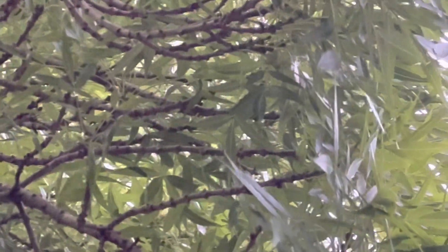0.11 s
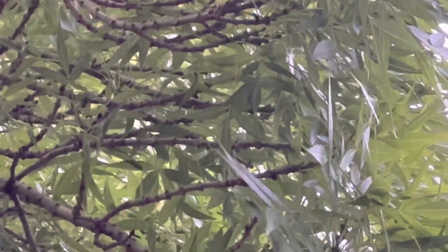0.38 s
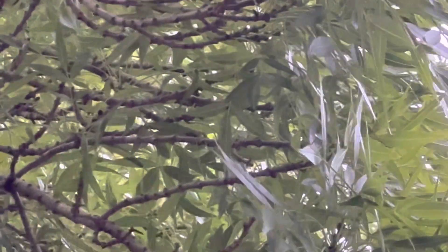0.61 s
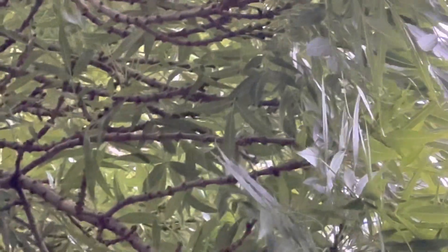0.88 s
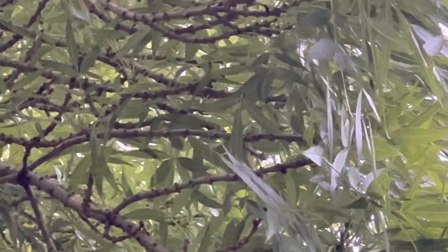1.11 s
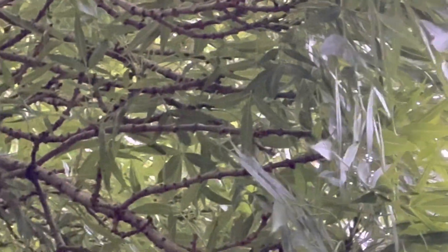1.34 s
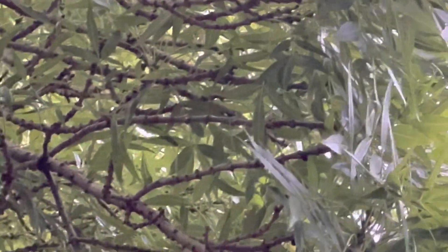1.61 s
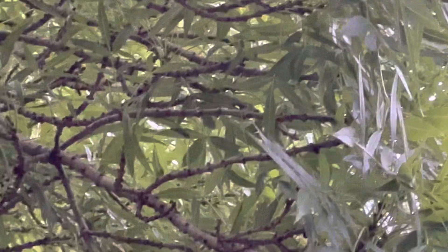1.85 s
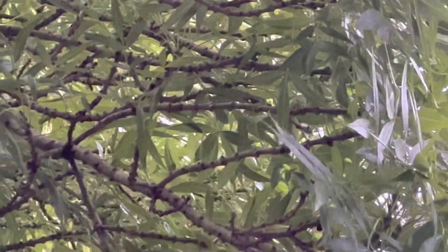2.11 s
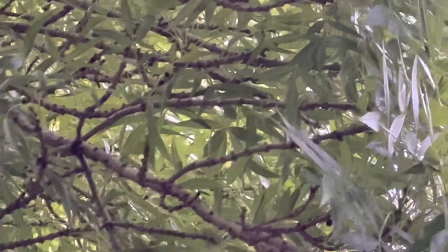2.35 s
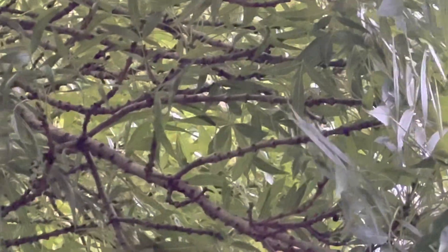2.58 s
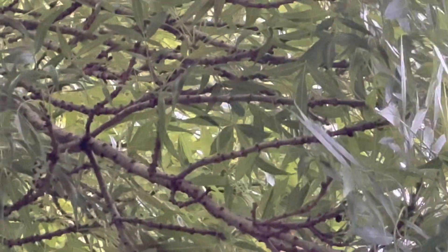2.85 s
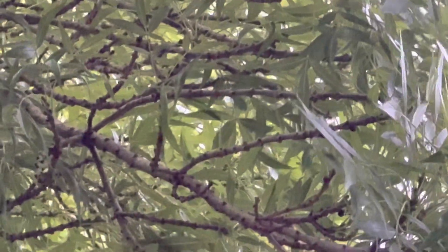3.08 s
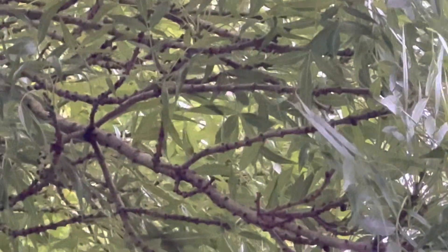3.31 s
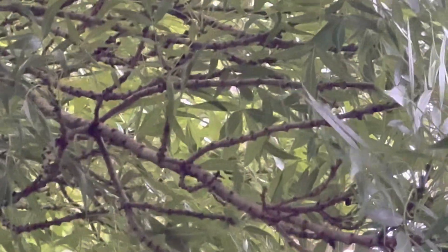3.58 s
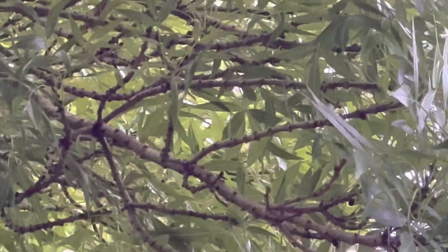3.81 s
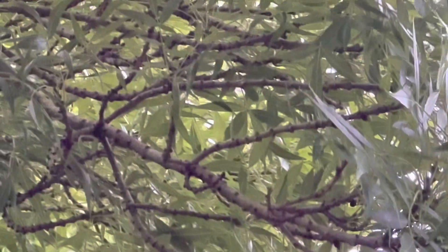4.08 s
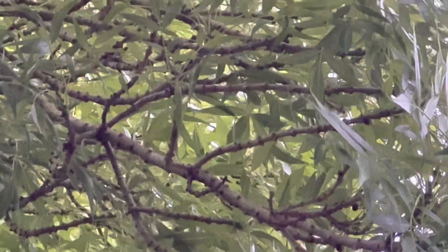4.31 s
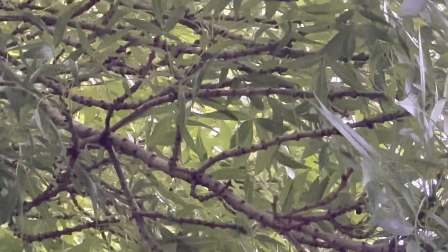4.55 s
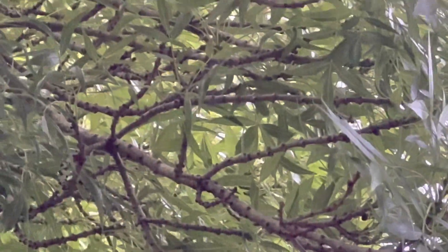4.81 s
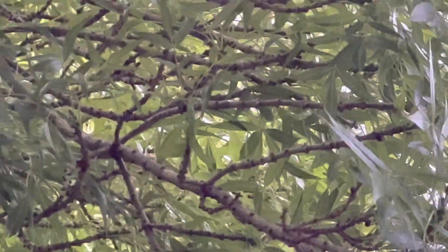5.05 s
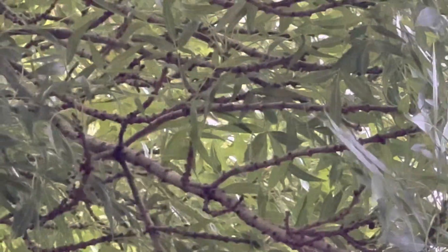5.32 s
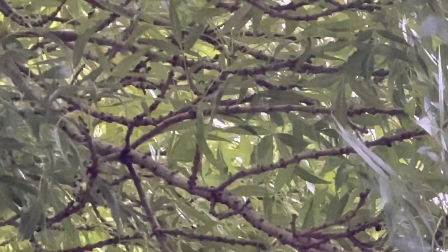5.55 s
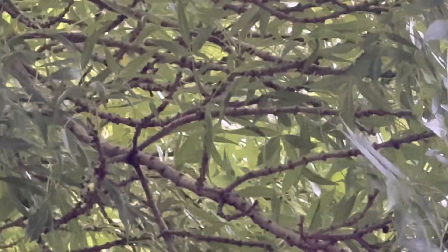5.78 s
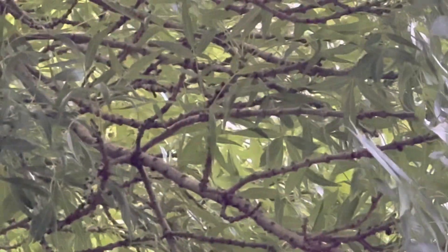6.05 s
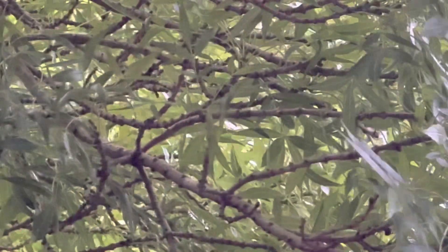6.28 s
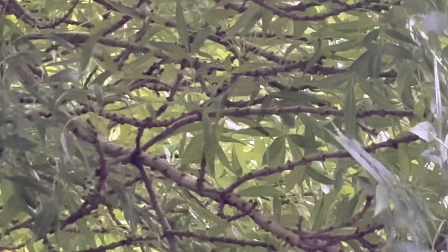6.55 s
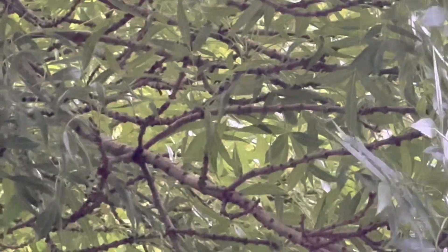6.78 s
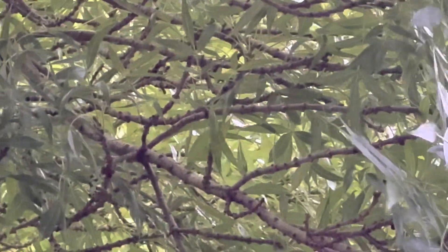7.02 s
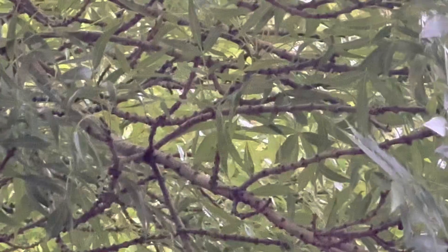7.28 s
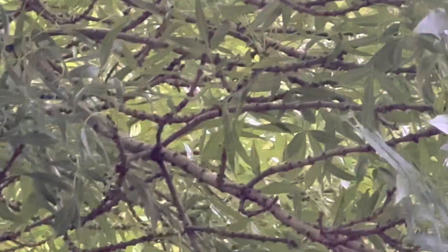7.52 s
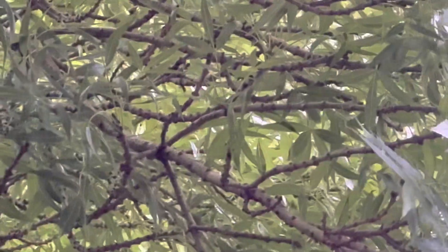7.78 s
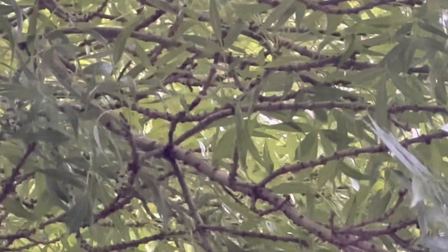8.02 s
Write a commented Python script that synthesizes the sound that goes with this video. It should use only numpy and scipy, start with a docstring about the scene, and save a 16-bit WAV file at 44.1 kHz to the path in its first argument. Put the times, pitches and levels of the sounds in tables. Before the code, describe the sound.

A small bird scolds with harsh arched notes and fast dry rattles in a leafy tree, while low wind thumps buffet the microphone.

```python
"""Harsh arched notes come first: a small bird scolding in a leafy tree, breaking into fast dry rattles.
Both are paired voices of its syrinx, beating together and coloured by a beak resonance.
A second bird throws in four chirps, warbling sines with hoarse overtones; a twig ticks close by.
Gusts of shaped noise and low eddies buffet the two ports of a hand-held microphone.
Far off, a narrow band of noise swells as a drone, and leaves hiss faintly."""
import sys
import numpy as np
from scipy import signal
from scipy.fft import rfft, irfft
from scipy.io import wavfile

SR = 44100
rng = np.random.default_rng(int(sys.argv[2]) if len(sys.argv) > 2 else 0)


def how_loud(loudness_db):
    """Turn decibels into a plain amplitude multiplier (0 dB gives 1, 20 dB gives 10)."""
    steps = np.asarray(loudness_db, float) / 20
    return 10 ** steps


def to_wav(sig):
    """Store sig (one row per channel, or 1-D mono) as 16-bit WAV at the path in sys.argv[1].

    Samples outside -1..1 are clipped; the rate is SR.
    """
    pcm = np.clip(np.atleast_2d(sig), -1, 1) * 32767
    pcm = np.round(pcm).astype(np.int16)
    wavfile.write(sys.argv[1], SR, pcm.T)  # frames by channels


N = 358974   # length in samples
HZ = np.maximum(np.fft.rfftfreq(N, 1 / SR), 1)   # FFT grid


def rms_one(x):
    """Scale to rms 1."""
    return x / np.sqrt(np.mean(x ** 2) + 1e-20)


def in_time(rows):
    """Columns of a curve at every sample."""
    s, *columns = np.transpose(rows)
    return [np.interp(np.arange(N) / SR, s, column) for column in columns]


def at_hz(points):
    """A spectrum table on the FFT grid, interpolated over log frequency."""
    hz, value = np.transpose(points)
    return np.interp(np.log(HZ), np.log(hz), value)


def wobble(rate_hz, count):
    """Smooth low-pass noise of rms 1, from two equal poles."""
    r = np.exp(-2 * np.pi * rate_hz / SR)
    run_in = int(SR / rate_hz)
    white = rng.standard_normal(count + run_in)
    return rms_one(signal.lfilter([1], [1, -2 * r, r * r], white)[run_in:])


def add(out, s, sound):
    """Mix a sound in at a time in seconds."""
    i = round(s * SR)
    out[i:i + len(sound)] += sound[:N - i]


# likeness of the noise at the two ports: (f/Hz, likeness 0-1)
PORT_LIKENESS = [(60, 0.87), (300, 0.89), (690, 0.56), (1100, 0.86), (1500, 0.36), (2100, 0.93), (3000, 1),
                 (8000, 0.71), (9600, 0.36), (14000, 0.61)]


def noise_pair(gain):
    """Coloured noise, as alike in both ports as the table says; rms 1."""
    mid, side = rfft(rng.standard_normal((2, N))) * gain
    alike = np.clip(at_hz(PORT_LIKENESS), 0, 1)
    ports = np.sqrt(1 + alike) * mid + np.sqrt(1 - alike) * side * [[1], [-1]]
    return rms_one(irfft(ports, N))


# strength of harmonics 1, 2, 3.. before the beak: (level/dB)
SYRINX_HARMONICS = [-4.5, -4, -5.5, -10, -12, -7.5, -28, -41.5]


def syrinx_note(level_db, top_hz, length, rough, beak_hz, shape, apart_hz, beak_db=10, beak_width=0.33):
    """Two voices beat together: harmonic k of their sum splits into k + 1 lines, coloured by the beak."""
    u = np.linspace(0, 1, max(int(length * SR), 64))   # share of the note
    bend = np.clip(length / .105, .65, 1)   # short notes bend less
    hz = top_hz * np.interp(u, *np.transpose(shape)) ** bend
    shake = .11 * np.clip(rough, 0, 1) ** 1.6
    # phases in cycles: the upper voice, and the beat between the two
    upper = np.cumsum(hz * (1 + shake * wobble(323.6, count=len(u)))) / SR
    beat = np.cumsum(apart_hz + shake * hz * wobble(357.0, count=len(u))) / SR + rng.random()
    beak = np.interp(u, [.18, .45, 1], (*beak_hz, 0.85 * beak_hz[1]))
    voices, shares = 0, np.ones(1)
    for k, db in enumerate(SYRINX_HARMONICS, start=1):
        shares = np.convolve(shares, [1, .8])   # binomial strengths of the split lines
        for j, share in enumerate(shares / np.linalg.norm(shares)):
            off_peak = np.log((k * hz - j * apart_hz) / beak) / beak_width
            lift_db = beak_db * np.exp(-off_peak ** 2)
            line = np.sin(2 * np.pi * (k * upper - j * beat + rng.random()))
            voices = voices + share * how_loud(db + lift_db) * line
    # air escapes in puffs at the beat rate, most at the start
    hissing = np.diff(rng.standard_normal(len(u) + 1))
    breath = hissing * (1 + np.cos(2 * np.pi * beat)) * np.exp(-1.5 * u)
    sound = rms_one(rms_one(voices) + how_loud(-20 + 2.2 * rough) * breath)
    attack = np.minimum(u * length / 0.013, 1) ** 0.4
    release = np.clip((1 - u) / 0.55, 0, 1)
    swell = attack * release * (0.56 + 0.3 * np.sin(np.pi * u ** 0.91))
    return how_loud(level_db - 9 + 0.88 * wobble(60, count=len(u))) * swell * sound


# arched notes: (t/s, nominal level/dB, top f/Hz, length/s, roughness 0-1)
ARCHED_NOTES = [(0.0156, -41, 2017, 0.11, 0.38), (0.193, -41, 1950, 0.097, 0.4),
                (0.3386, -39.5, 1943, .1, 0.41), (0.4893, -43, 1915, 0.11, 0.32),
                (1.418, -43.5, 1519, 0.081, 0.17), (1.5546, -40.5, 1620, 0.082, 0.42),
                (1.8463, -44.5, 1570, 0.089, 0.36), (1.979, -36.5, 1841, 0.09, 0.22),
                (2.128, -35, 1918, 0.1, 0.3), (2.306, -37, 1940, 0.12, 0.34),
                (2.4627, -38.5, 1967, 0.12, 0.36), (2.683, -39.5, 1890, 0.11, 0.41),
                (2.868, -38.5, 1929, .105, 0.39), (6.183, -42, 1782, 0.097, 0.42),
                (6.3248, -38, 1953, 0.12, 0.42), (6.4998, -36, 2037, 0.12, 0.38),
                (6.6712, -36.5, 2020, .11, 0.25), (7.796, -41.5, 2030, 0.1, 0.73)]
# pitch through an arch, before short notes flatten it: (share of length, share of top f)
ARCH_PITCH = [(0, .73), (.15, .86), (.36, 1), (.47, .98), (.72, .78), (1, .54)]


def arched_notes():
    """Long notes with split lines; the beak resonance falls towards the voice as the beak closes."""
    beak_open_hz, beak_closes_to = 5250, 1.6   # the second is a multiple of the top pitch
    out = np.zeros(N)
    for s, db, hz, length, rough in ARCHED_NOTES:
        beak_hz = (beak_open_hz, beak_closes_to * hz)
        add(out, s - .008, syrinx_note(db, hz, length, rough, beak_hz, ARCH_PITCH, apart_hz=.165 * hz))
    return out


# rattle notes: (t/s, nominal level/dB)
RATTLE_NOTES = [(.6678, -54.5), (0.7185, -61), (0.8046, -48), (0.8605, -47), (0.9285, -47), (0.998, -43),
                (1.2174, -42), (1.3268, -45), (3.4062, -48), (3.4806, -49.5), (3.547, -49), (3.6071, -49),
                (3.6658, -49.5), (3.708, -46), (3.8595, -47), (3.92, -47.5), (3.9761, -48.5),
                (4.0712, -47.5), (4.143, -49.5), (4.1897, -50), (4.238, -49), (4.2914, -46), (4.341, -49),
                (4.3921, -50.5), (4.4398, -52.5), (4.4858, -50), (4.545, -50), (4.5833, -46.5),
                (4.6352, -46), (4.6827, -46.5), (4.7327, -56.5), (4.8162, -47), (4.8694, -46),
                (4.9207, -44.5), (4.9691, -46), (5.0599, -45), (5.1298, -44.5), (5.1849, -46),
                (5.2439, -46), (5.3261, -44.5), (5.3984, -46.5), (5.4662, -51.5), (5.5148, -49.5),
                (5.593, -44.5), (5.718, -42.5), (5.782, -45), (5.872, -45), (5.9048, -44), (6.0282, -51.5),
                (6.0967, -45.5), (6.8495, -45), (6.9257, -48), (6.9803, -47.5), (7.0338, -48.5),
                (7.1607, -47), (7.2238, -44.5), (7.2734, -50.5), (7.3439, -51.5), (7.41, -46),
                (7.4731, -48), (7.534, -45.5), (7.6672, -46.5)]
# pitch through a rattle note, before short notes flatten it: (share of length, share of top f)
RATTLE_PITCH = [(0, 0.85), (0.301, 0.98), (1.002, 0.93)]
# how the bird holds its rattle: (t/s, mean top f/Hz, beak resonance f/Hz early in a note)
RATTLE_HOLD = [(.7, 1860, 3620), (1.0, 1760, 4100), (1.22, 1925, 6050), (1.32, 1701, 3315),
               (3.41, 1717, 3300), (3.95, 1864, 3750), (4.3, 1716, 3790), (4.68, 1726, 5100),
               (4.98, 1814, 5250), (5.05, 1830, 4200), (5.4, 2150, 4570), (6.03, 2245, 4140),
               (6.09, 1740, 3420), (6.85, 1744, 4100), (7.04, 1860, 4020), (7.16, 1738, 3780),
               (7.55, 1990, 4360)]


def rattles():
    """Short, rough, throbbing notes, longer before a pause; louder ones have a lower beak peak."""
    pitch_scatter = 0.0403   # share, note to note
    usual_db, usual_beak_db, beak_db_per_db = -47, 11, -1.03
    duty, shortest_s, longest_s = 0.619, .03, 0.0495   # duty: share of the time to the next note
    out = np.zeros(N)
    pauses = np.diff(np.append(np.array(RATTLE_NOTES)[:, 0], np.inf))
    pitch_hz, beak_hz = in_time(RATTLE_HOLD)
    for (s, db), pause in zip(RATTLE_NOTES, pauses):
        length = np.clip(duty * pause, shortest_s, longest_s)
        i = int(s * SR)
        hz = pitch_hz[i] * (1 + pitch_scatter * rng.standard_normal())
        beak = (beak_hz[i], 1.12 * beak_hz[i])
        beak_db = usual_beak_db + beak_db_per_db * (db - usual_db)
        add(out, s - .008, syrinx_note(db, hz, length, 0.96, beak, RATTLE_PITCH, 169.4, beak_db, 0.28))
    return out


# chirps of the second bird: (t/s, level/dB)
CHIRP_CALLS = [(1.657, -45), (3.733, -44), (5.925, -44), (7.586, -45)]
# course of one chirp: (t/s from its listed time, f/Hz before warble, level/dB against the call)
CHIRP_COURSE = [(-.008, 2090, -20.5), (0, 2900, -19), (.008, 3950, -6), (0.026, 4019, -1),
                (0.03, 3242, -5.5), (0.039, 2906, -2.5), (0.045, 2400, -13.5), (0.056, 3021, 0.5),
                (.078, 2750, -7.5), (.088, 2340, -13.5), (0.108, 2710, -30)]


def chirping_bird():
    """A warbling, throbbing sine with hoarse overtones, and a thin upward flick near its start."""
    out = np.zeros(N)
    t, hz, db = np.transpose(CHIRP_COURSE)
    time = np.arange(t[0], t[-1], 1 / SR)
    for s, level_db in CHIRP_CALLS:
        regular = (0.0088 + .3 * time) * np.sin(2 * np.pi * 115 * time)
        warble = 1 + 0.0296 * wobble(200, count=len(time)) + regular
        phase = 2 * np.pi * np.cumsum(np.interp(time, t, hz) * warble) / SR
        tone = np.sin(phase) * (1 + how_loud(-18) * wobble(1520, count=len(time)))
        # a fast throb roughens the glide
        throb_depth = 0.25 + 0.51 * np.exp(-(time / 0.029) ** 4)
        tone *= 1 + throb_depth * np.sin(2 * np.pi * (300 * time + rng.random()))
        overtones = how_loud(-14.5) * np.sin(2 * phase) + how_loud(-9) * np.sin(3 * phase) + how_loud(-25.5) * np.sin(5 * phase)
        tone += overtones * wobble(630, count=len(time))   # hoarse, so they spread into bands
        course_db = level_db + np.interp(time, t, db) + 1.6 * wobble(110, count=len(time))
        add(out, s + t[0], how_loud(course_db) * np.sqrt(2) * tone)
        flick = 2 * np.pi * np.cumsum(np.geomspace(3700, 6300, int(0.011 * SR))) / SR
        add(out, s - .001, how_loud(level_db - 10) * np.hanning(len(flick)) * np.sin(flick))
    return out


def foliage(x, echo_db):
    """Countless small echoes from leaves and walls: a dying noise, partly different at each port."""
    echo_t60_s = 0.25
    t = np.arange(int(.6 * SR)) / SR
    shared, own = rng.standard_normal((2, len(t)))
    dying = how_loud(-60 * t / echo_t60_s) * np.minimum(t / 0.00064, 1)
    tails = (shared + 0.22 * own * [[1], [-1]]) * dying / np.sqrt(np.sum(dying ** 2))
    return x + how_loud(echo_db) * signal.fftconvolve(x[None], tails, axes=1)[:, :N]


# ticks of a twig close by: (t/s, nominal level/dB)
TWIG_TICKS = [(6.457, -50), (7.93, -60)]


def twig():
    """A dry click: a noise burst that fades within about a millisecond."""
    out = np.zeros(N)
    for s, db in TWIG_TICKS:
        add(out, s, how_loud(db) * rng.standard_normal(64) * np.exp(-np.arange(64) / 14))
    return out


# gusts on the ports: (t/s, rumble level/dB, flutter level/dB), before the lumps
GUST_COURSE = [(0, -58.5, -73.5), (.27, -48, -56.5), (.38, -59.5, -76), (.47, -50.5, -51.5),
               (.6, -69.5, -86), (1.12, -80, -84), (1.45, -59, -62.5), (1.65, -76.5, -83),
               (1.95, -79.5, -85), (2.3, -59, -71), (2.6, -55.5, -70), (2.88, -68.5, -82.5),
               (3.06, -46.5, -62.5), (3.5, -49, -74.5), (3.85, -53, -68.5), (4.05, -40.5, -53),
               (4.22, -50.5, -67.5), (4.4, -45, -46.5), (4.58, -61.5, -72), (4.8, -53, -61),
               (5.1, -71.5, -78), (5.45, -59, -70.5), (5.9, -71, -78), (6.2, -61, -67), (7.0, -63, -77.5),
               (7.3, -72, -83), (8.14, -57, -81.5)]
# single eddies: (t/s, nominal level/dB, nominal f/Hz)
EDDIES = [(0.048, -36.5, 49.7), (0.23, -27.5, 101), (0.44, -32, 70.0), (0.471, -35.5, 74.6),
          (0.507, -28.5, 62), (1.416, -43.5, 129.5), (1.471, -42, 62.4), (2.43, -40, 90),
          (2.513, -39.5, 68.4), (2.969, -34, 61), (3.052, -22.5, 75.4), (3.087, -23, 73.5),
          (3.19, -22, 65.5), (3.439, -33, 53.8), (3.488, -26, 51), (3.857, -42.5, 92.6),
          (3.918, -16.5, 91.4), (3.946, -8.5, 64.7), (4.033, -28.5, 95.6), (4.05, -20, 69.8),
          (4.089, -24.5, 85), (4.152, -19.5, 68.5), (4.341, -30.5, 80), (4.398, -31, 65),
          (4.468, -34.5, 78), (4.696, -46, 73), (4.831, -41, 50), (4.899, -40.5, 51.3), (6.177, -42, 60),
          (6.352, -49.5, 124), (6.94, -39.5, 87.4), (7.017, -38, 63.6), (7.501, -39.5, 69)]
# colour of the rumble: (f/Hz, relative level/dB)
RUMBLE_COLOUR = [(25, -47.5), (40, 6.5), (55, 11.5), (80, 7.5), (110, -3), (150, -25), (220, -63)]
# colour of the flutter: (f/Hz, relative level/dB)
FLUTTER_COLOUR = [(90, -8.5), (140, 7.5), (220, -7.5), (350, -18.5), (550, -45.5), (800, -55)]


def wind():
    """Lumpy rumble and flutter, and single eddies that push the membranes for a few slowing cycles."""
    lumps_per_s, rumble_lumps_db, flutter_lumps_db = 12, 4.5, 4.5
    puff_at_full_db, puff_db_per_db = -17.5, 2.5   # finer turbulence grows steeply with the eddy
    shiver_db = -25.5   # flutter that an eddy drags along, against its push
    gust_db, flutter_db = in_time(GUST_COURSE)
    lumps = wobble(lumps_per_s, count=N)
    eddies, puffs, shivers = np.zeros((3, N))
    for (s, db, hz), turn in zip(EDDIES, rng.random(len(EDDIES))):
        u = np.arange(int(.12 * SR)) / SR / 0.0316
        phase = 2 * np.pi * (hz * 0.03305 * u * (1.25 - 0.18 * u) + turn)
        push = how_loud(db) * (1 - np.exp(-(1.88 * u) ** 2)) * np.exp(-u ** 2)
        puff = how_loud(puff_at_full_db + puff_db_per_db * db) * np.exp(-((u - .3) / 0.21) ** 2)
        add(eddies, s - .012, push * np.sin(phase))
        add(shivers, s - .012, how_loud(shiver_db) * push)
        add(puffs, s - .012, puff)
    rumble = how_loud(gust_db + rumble_lumps_db * lumps) * noise_pair(how_loud(at_hz(RUMBLE_COLOUR)))
    flutter_level = how_loud(flutter_db + flutter_lumps_db * lumps) + shivers
    flutter = flutter_level * noise_pair(how_loud(at_hz(FLUTTER_COLOUR)))
    # each eddy sheds a short puff of finer turbulence
    puff_colour = 1 / (1 + (HZ / 470) ** 8) / (1 + (250 / HZ) ** 4)
    return rumble + flutter + eddies + puffs * noise_pair(puff_colour)


# swells of the far drone: (middle t/s, half length/s, level/dB)
DRONE_SWELLS = [(.2, 0.84, -71.5), (2.402, 0.41, -73.5), (2.9, 0.11, -76), (3.604, .12, -73),
                (4.5, 0.26, -67.5), (5.102, 0.29, -68), (6.6, 0.16, -75), (7.4, 0.24, -70),
                (7.803, 0.35, -68.5)]
# colour of the far hiss: (f/Hz, relative level/dB)
HISS_COLOUR = [(60, -19.5), (200, 0.5), (400, -3), (700, -4.5), (1200, -3.5), (1600, 1), (2000, -6.5),
               (3000, -12), (6000, -19.5), (16000, -5.5)]


def distance():
    """Smooth far hiss and a drone, a narrow band of noise that comes and goes."""
    drone_hz, drone_width_hz = 1514, 115
    hiss_db, hiss_wander_db = -65, 2.02
    time = np.arange(N) / SR
    swells = sum(how_loud(db) * np.exp(-((time - s) / half_s) ** 2) for s, half_s, db in DRONE_SWELLS)
    hiss_level = how_loud(hiss_db + hiss_wander_db * wobble(1.5, count=N))
    hiss = hiss_level * noise_pair(how_loud(at_hz(HISS_COLOUR)))
    return hiss + swells * noise_pair(1 / (1 + ((HZ - drone_hz) / drone_width_hz) ** 2))


def scene():
    """Both birds through the foliage, the twig close by, wind on the ports and the far sounds."""
    scolding = foliage(arched_notes() + rattles(), echo_db=-2.5)
    chirping = foliage(chirping_bird(), echo_db=-5.5)
    return scolding + chirping + twig() + wind() + distance()


def band_limit(x):
    """A steep low-pass at the top of the band."""
    return signal.sosfilt(signal.butter(12, 15810, fs=SR, output="sos"), x)


# overall treble colour of the sound, the microphone's only up to about 10.5 kHz: (f/Hz, level/dB)
TREBLE_COLOUR = [(1000, 2), (2200, 1), (3000, 5.5), (6000, 2), (7000, -5.5), (7400, -25), (7800, -9.5),
                 (9500, -12.5), (10400, -23.5), (10900, -55.5), (12300, -32), (12700, -20), (15500, -26)]
# lead of the left port over the right: (f/Hz, phase/rad)
LEFT_LEAD = [(300, .15), (700, .7), (1100, 1.3), (1450, 2.2), (1800, 1.3), (2100, .4), (3000, .7),
             (3700, .6), (4400, .1), (8600, 0), (9300, -1.6), (12000, -.6)]
# left port against the right: (f/Hz, level/dB)
LEFT_EXCESS = [(1200, 0), (1750, -6), (2100, 0)]


def record(dry):
    """An overall treble colour on both channels; the two ports differ in phase and level."""
    half = np.exp(.5j * at_hz(LEFT_LEAD)) * how_loud(at_hz(LEFT_EXCESS) / 2)   # half the difference to each port
    ports = irfft(rfft(dry) * how_loud(at_hz(TREBLE_COLOUR)) * [half, 1 / half], N)
    return band_limit(ports)


dry = scene()
out = record(dry)
to_wav(out)
```